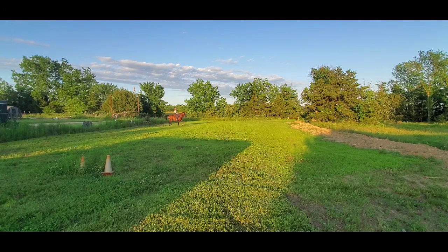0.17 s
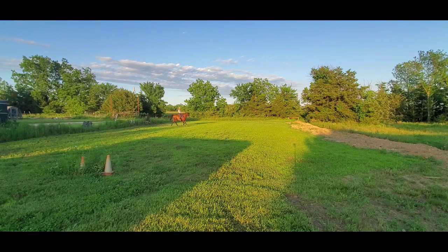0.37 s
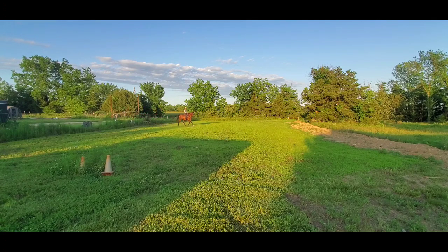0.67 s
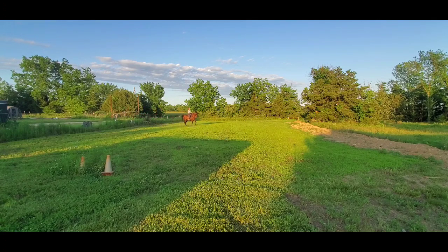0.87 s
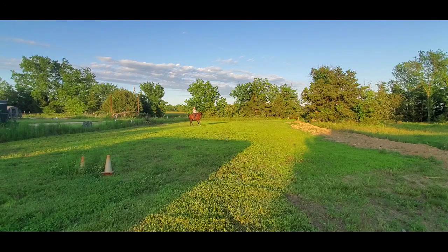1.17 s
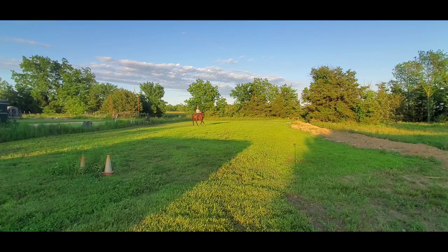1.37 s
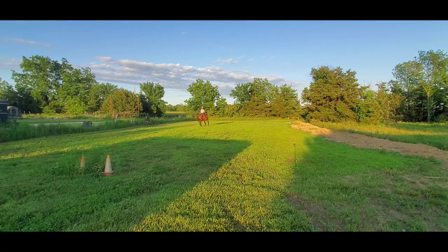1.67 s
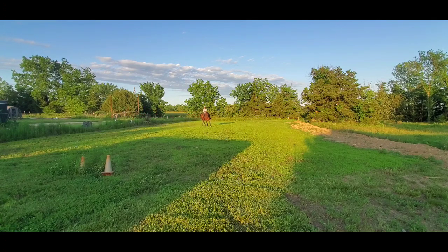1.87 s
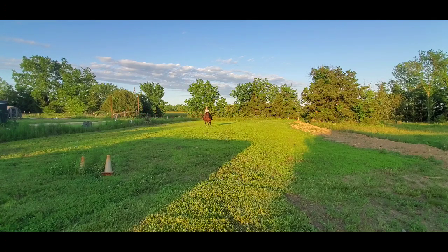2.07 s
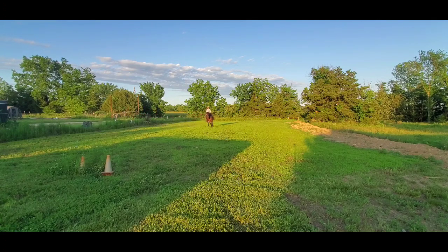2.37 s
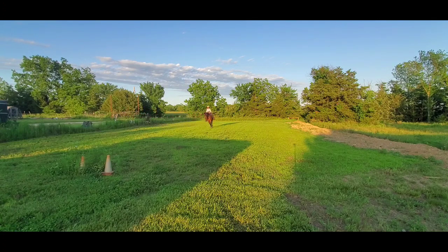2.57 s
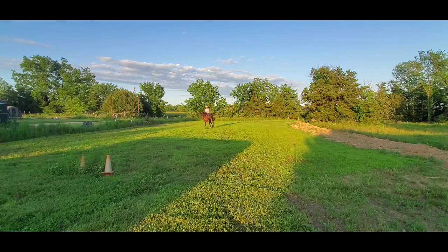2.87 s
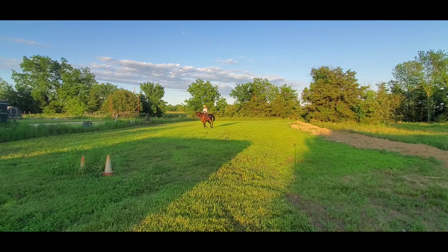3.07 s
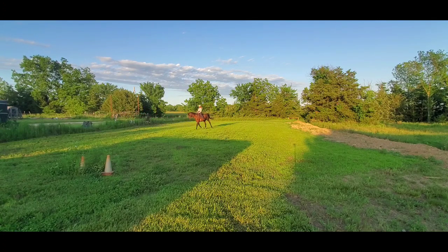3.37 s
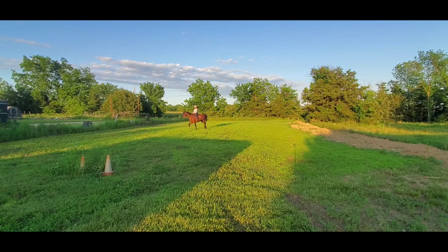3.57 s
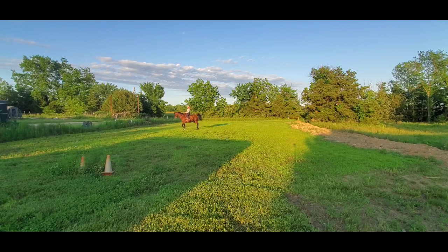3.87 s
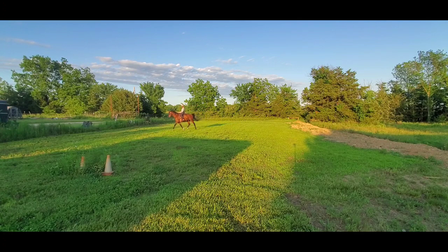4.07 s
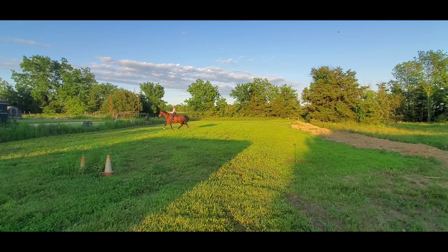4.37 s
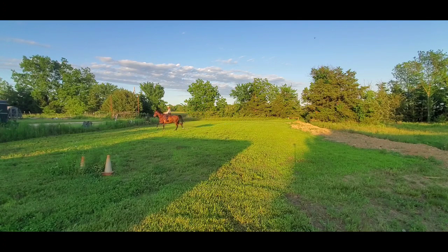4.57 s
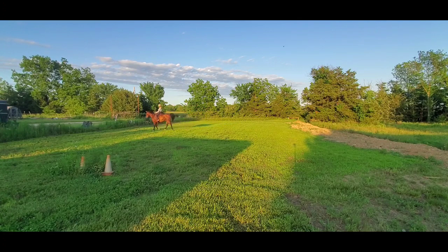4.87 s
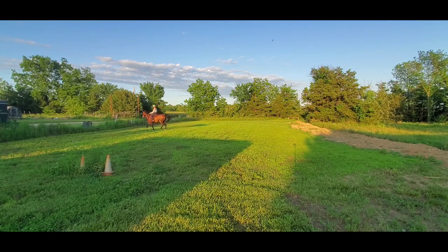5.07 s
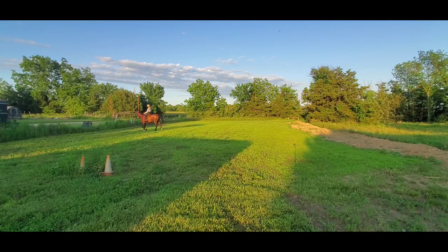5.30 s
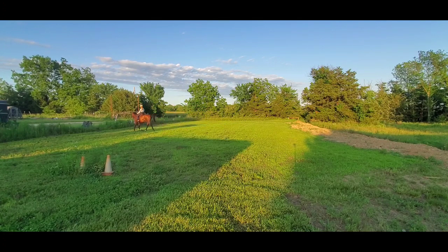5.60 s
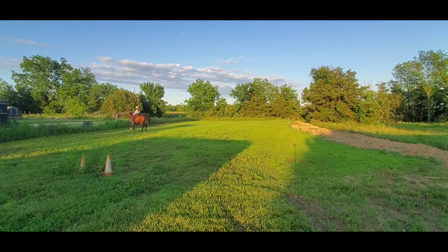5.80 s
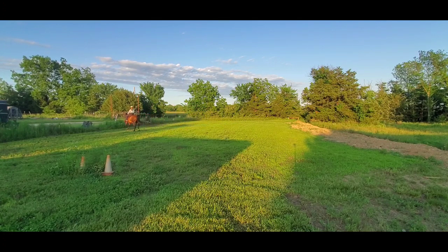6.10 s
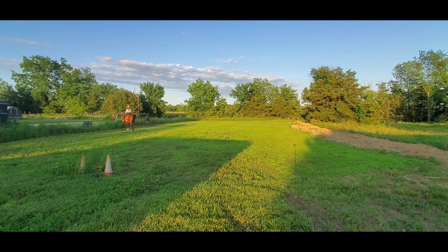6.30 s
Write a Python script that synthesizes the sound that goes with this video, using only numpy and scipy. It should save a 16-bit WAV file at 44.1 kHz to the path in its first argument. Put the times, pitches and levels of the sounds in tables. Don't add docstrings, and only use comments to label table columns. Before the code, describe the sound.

An evening meadow heard through a small stereo recorder, with nature mostly on the left and wind mostly on the right. From the start a songbird whistles rapid swooping, falling notes, with bright calls around 1.0 to 1.7 seconds and a four-syllable trill from 1.8 to 2.3; afterwards only faint far notes remain. Throughout, a bush cricket rasps in very short buzzes that swell and stop dead, over a soft high chorus of far crickets and one rough chirping cricket. Dry grass rustles in fine grains, busier from 2 seconds, with sharp stem ticks. A distant horse blows softly through its nostrils near 1.3, 3.2, 3.6, 4.65, 5.2, 5.45 and most strongly 5.8. Low gusts build from 1.7, thump heavily on the right between 2.85 and 3.75, ease towards 5.1, then return around 5.5, briefly buffeting the left too, and continue to the end at about 6.4.

```python
import sys
import numpy as np
from scipy import signal
from scipy.fft import rfft, irfft, next_fast_len
from scipy.io import wavfile
from scipy.ndimage import uniform_filter1d

SR = 44100
rng = np.random.default_rng(int(sys.argv[2]) if len(sys.argv) > 2 else 0)


def to_wav(s):
    ch = np.atleast_2d(s).T
    pcm = np.round(np.clip(ch, -1, 1) * 32767)
    wavfile.write(sys.argv[1], SR, pcm.astype(np.int16))


def gain_from_decibels(decibels):
    exponent = np.asarray(decibels, float) / 20
    return 10 ** exponent


N = 284004

# frequency in Hz, level in dB per Hz.
AIR_SPECTRUM = [(150, -18), (350, -3), (700, -4.5), (1400, -1.5), (2200, -9.5), (3200, -4.5), (7500, -10.5),
                (11000, -25.5), (15800, -9)]
# frequency in Hz, level in dB per Hz.
HISS_SPECTRUM = [(22, 20), (45, 16), (150, 9.5), (500, -6), (1300, -12), (3000, -15), (7000, -52),
                 (12000, -17.5), (15800, -30.5)]
AIR_DB, HISS_DB = -72.5, -70
# frequency in Hz, gain in dB.
COVER_LOSS = [(200, -4), (800, -15), (2500, -26), (4400, -33), (9000, -30), (15000, -31)]

# centre in Hz, width in Hz, level in dB.
CHORUS_BANDS = [
    (4202, 760, -71.5),
    (5380, 710, -65.5),
    (6360, 420, -109.5),
]
# centre in seconds, level in dB.
CRICKET_CHIRPS = [(.08, -70), (.26, -70), (.42, -68), (1.25, -68), (1.82, -66), (2.037, -67.5),
                  (2.251, -66), (2.437, -68), (2.644, -65), (2.85, -65.5), (3.051, -66.5), (3.274, -66),
                  (3.49, -65), (3.73, -65), (4.054, -66), (4.238, -66), (4.464, -66.5), (4.679, -70),
                  (4.871, -71), (5.29, -73), (5.483, -66), (5.58, -73), (5.682, -65.5), (5.79, -71),
                  (5.9, -65.5), (6.15, -72), (6.37, -73)]

# frequency in Hz, level in dB per Hz.
RUSTLE_SPECTRUM = [(1500, -7.5), (3000, -8), (6000, 1.5), (8300, -11), (10500, -1), (12500, 1),
                   (14000, 3.5), (15800, -11)]
# peak in seconds, level in dB, rise and fall in seconds per 10 dB.
GRASS_SWISHES = [(.18, -86, 1.5, 1.4), (.83, -81, .02, .3), (.98, -74.5, .035, .12), (1.4, -80.5, .07, .8),
                 (1.85, -78, .08, .04), (2.0, -70, .03, .11), (2.34, -71.5, .12, .047),
                 (2.69, -71, .115, .19), (3.06, -69, .07, .11), (3.18, -68, .05, .05),
                 (3.33, -72, .11, .28), (3.6, -68.5, .1, .08), (3.8, -69.5, .07, .16),
                 (4.04, -66, .036, .045), (4.21, -74.5, .17, .05), (4.59, -71.5, .08, .17),
                 (5.03, -74.5, .03, .076), (5.19, -72.5, .064, .13), (5.58, -71.5, .09, .062),
                 (5.72, -70, .031, .092), (5.86, -70, .025, .09), (5.99, -67, .047, .04),
                 (6.27, -71, .12, .12)]
STILL_GRASS_DB = -102
# start in seconds, peak in dB.
STEM_TICKS = [(0.814, -79), (0.9597, -68), (1.8257, -80), (1.9574, -74), (1.9926, -63), (2.3337, -64),
              (2.685, -70), (3.3214, -66), (4.361, -78), (4.6987, -75), (4.7301, -84), (5.1894, -69),
              (5.5812, -66.5), (5.7066, -71), (5.849, -64.5), (6.267, -64.5)]

# centre in seconds, length in seconds, level in dB, centre frequency in Hz.
HORSE_BLOWS = [
    (1.313, .1, -73.5, 1210),
    (3.185, 0.082, -62.5, 850),
    (3.178, .025, -70, 3200),
    (3.562, 0.098, -72, 700),
    (4.647, 0.077, -61.5, 665),
    (4.715, 0.052, -70, 900),
    (5.242, 0.05, -71.5, 890),
    (5.454, 0.067, -67.5, 630),
    (5.822, 0.083, -60, 740),
]

# last stroke in seconds, length in seconds, last stroke in dB,
# octave against the stroke in dB.
SWELLING_PHRASES = [(.1184, .108, -54, -1.5), (.172, .045, -56.5, -9), (1.313, .083, -55, -.5),
                    (1.5025, .058, -53.5, -22), (1.669, .049, -54.5, -14), (1.8534, .043, -53.5, -16),
                    (2.326, .236, -55.5, -5), (2.509, .053, -54.5, -9), (2.787, .054, -54, -2),
                    (3.2475, .044, -54.5, -7), (3.487, .057, -49.5, -3.5), (3.746, .036, -50, -6),
                    (3.92, .135, -59.5, 2.5), (4.202, .05, -56, -1), (4.4135, .054, -54, -7),
                    (4.512, .069, -56.5, 1.1), (4.6325, .043, -53, -1.1), (4.857, .037, -53.5, -8),
                    (5.096, .055, -53, -5), (5.331, .04, -56.5, -3), (5.5504, .041, -50.5, -7),
                    (5.982, .042, -57, 1.5), (6.44, .026, -57, -3)]
HELD_PHRASES = [(.4465, .05, -62, -.5), (1.084, .14, -65, -11), (2.0325, .08, -68, -1.9),
                (3.0245, .09, -57, -1.5), (3.573, .061, -55.5, -2.1), (4.009, .074, -58, -3),
                (4.977, .081, -59.5, -2.6), (5.253, .077, -71, .1), (5.7674, .07, -55.5, 1.1),
                (6.256, .096, -58.5, .1)]
SWELL_DB, HOLD_SWELL_DB = 14, 4
STROKE_HZ, HASTE_HZ_PER_S = 103, 60
CLIMB = .035

# share of the length, share of the way from first to second pitch,
# level in dB.
DROP_SHAPE = [(0, 0, -4), (.58, .2, 0), (1, 1, -16)]
SWOOP_SHAPE = [(0, 0, -20), (.45, -.06, -3), (.74, .28, -1), (1, 1, 1)]
SETTLE_SHAPE = [(0, 0, -12), (.16, .78, 0), (.45, 1, -1.5), (1, .98, -8)]
SLIDE_SHAPE = [(0, 0, -8), (.11, .5, -1.5), (.33, .73, -2.5), (.64, .89, 0), (1, 1, -7)]
ARCH_SHAPE = [(0, 0, -18), (.25, .86, 0), (.45, 1, -5), (.7, .8, -3), (.87, .45, -10), (1, -.1, -16)]
HOOK_SHAPE = [(0, 0, 0), (.17, .7, -19), (.33, 1, -30), (.56, .4, -9), (.73, .08, 0), (1, 0, -17)]
GLIDE_SHAPE = [(0, 0, -3), (.5, .5, 0), (1, 1, -6)]
# start in seconds, length in seconds, first pitch in Hz,
# second pitch in Hz, peak in dB.
DROP_NOTES = [(.163, .02, 3070, 2730, -57), (.197, .02, 3720, 3200, -49), (.31, .057, 3770, 2960, -54),
              (.392, .023, 3120, 2700, -59)]
SWOOP_NOTES = [(1.34, .063, 6550, 4990, -49), (1.565, .07, 6450, 4830, -51)]
SETTLE_NOTES = [(.372, .07, 3555, 5400, -53), (.428, .016, 3500, 3760, -52), (.603, .058, 5570, 4480, -50),
                (.84, .06, 2600, 3020, -73), (4.49, .06, 2750, 2900, -72)]
SLIDE_NOTES = [(.998, .097, 6400, 3920, -44.5)]
ARCH_NOTES = [(.095, .103, 3100, 4595, -47)]
HOOK_NOTES = [(1.095, .125, 3880, 2200, -56), (1.408, .06, 4420, 2940, -43), (1.637, .05, 4300, 2930, -48)]
GLIDE_NOTES = [(.015, .022, 3720, 3650, -57), (.43, .03, 6950, 3400, -58), (.66, .035, 4500, 5400, -63),
               (.745, .03, 3300, 3800, -59), (4.435, .055, 2350, 2800, -66), (.697, .03, 5600, 6520, -50),
               (.778, .028, 3900, 2700, -66), (.8, .08, 3850, 4150, -70), (.975, .014, 4800, 5400, -57),
               (.986, .01, 5400, 6900, -62), (.47, .07, 1950, 1780, -74), (.55, .04, 3500, 3450, -73),
               (2.6, .1, 2950, 2850, -72), (2.89, .06, 3600, 3050, -75), (2.945, .055, 3020, 2930, -66),
               (3.04, .08, 2960, 3050, -71), (3.33, .14, 4000, 3380, -65), (3.47, .1, 3300, 2950, -72),
               (3.995, .03, 2950, 3300, -68), (4.66, .2, 2830, 2760, -72), (4.72, .12, 2400, 2300, -74),
               (6.11, .09, 4300, 4400, -72), (6.2, .1, 3900, 3550, -73)]
# start in seconds, lift in dB.
TRILLS = [
    (1.788, 5.5),
    (1.936, 4.5),
    (2.083, 4.5),
    (2.227, 2.5),
]
# seconds after its start, pitch in Hz, peak in dB.
TRILL_SYLLABLE = [
    [(.003, 4300, -60), (.008, 5280, -55), (.012, 6400, -60)],
    [(.021, 6300, -66), (.026, 4850, -54), (.031, 3700, -66)],
    [(.034, 3540, -80), (.05, 3330, -66), (.075, 3210, -70), (.105, 3030, -76)],
]

# frequency in Hz, level in dB per Hz.
BUFFET_SPECTRUM = [(20, -33), (33, -10), (48, 10), (75, 3.5), (105, -5), (150, -15), (210, -23.5),
                   (300, -33), (500, -51.5), (900, -78)]
# peak in seconds, level in dB.
WIND_VEERS = [(2.48, -65), (3.23, -64), (3.39, -57), (3.57, -50), (3.72, -59), (3.79, -59), (4.05, -63),
              (4.2, -65), (4.7, -69), (4.85, -64), (4.96, -57), (5.47, -58), (5.51, -58), (5.585, -46),
              (5.63, -46), (5.67, -54), (5.86, -55), (5.92, -53), (5.95, -54), (6.32, -59), (6.42, -57)]
VEER_RISE_S, VEER_FALL_S, LEE_CALM_DB = .022, .065, -92
LEE_EDGE_HZ = 280
# time in seconds, level in dB.
GUST_FORCE = [(0, -52), (.7, -57), (1.3, -53), (1.78, -42), (2.1, -46), (2.4, -39), (2.85, -36),
              (3.0, -30.5), (3.7, -34.5), (3.8, -43), (4.5, -50), (5.15, -60), (5.35, -52), (5.46, -38),
              (5.85, -37), (5.96, -45), (6.44, -41)]
# middle in seconds, change in dB.
GUST_PUFFS = [(.4, 9), (1.09, 7), (2.48, -7), (2.97, 6), (3.25, -14), (4.27, -5), (4.46, 4), (4.56, -5),
              (4.66, 8), (5.25, 11), (5.6, -6), (5.75, -3)]
PUFF_S = .1
# start in seconds, peak in dB.
LEFT_BURSTS = [(5.576, -42), (5.613, -44), (5.65, -50), (5.668, -48), (5.855, -54)]
# start in seconds, peak in dB.
RIGHT_BURSTS = [(2.853, -29), (2.907, -25), (2.944, -31), (2.984, -21), (3.022, -33), (3.121, -30),
                (3.179, -32), (3.273, -40), (3.337, -31), (3.374, -34), (3.427, -30), (3.445, -31),
                (3.479, -31), (3.525, -22), (3.563, -31), (3.68, -31), (3.723, -24)]
SWING_HZ, SWING_RISE_S, SWING_FALL_S = 68, .005, .016
SNAP_TURNS, SNAP_S = .2, .005
# middle in seconds, peak in dB.
ROLLING_EDDIES = [(1.758, -38), (2.265, -38), (2.3, -39), (2.335, -36), (2.371, -32), (2.405, -39),
                  (2.564, -37), (2.648, -35), (2.685, -38), (2.713, -36), (2.75, -31), (2.815, -37),
                  (2.96, -27), (3.097, -28), (3.143, -27), (3.33, -29), (3.634, -32), (3.71, -29),
                  (3.909, -36), (4.037, -36), (4.218, -37), (4.44, -43), (4.661, -39), (4.7, -43),
                  (4.921, -38), (5.468, -37), (5.522, -35), (5.557, -29), (5.69, -35), (5.785, -40),
                  (5.84, -33), (5.928, -36), (6.147, -38), (6.31, -40)]
ROLL_HZ, ROLL_S = 74, .0105


def rms_one(x):
    return x / np.sqrt(np.mean(x ** 2) + 1e-20)


def colour(x, points):
    hz, db = np.transpose(points)
    size = next_fast_len(len(x) + SR // 4)
    log_hz = np.log(np.fft.rfftfreq(size, 1 / SR) + 1)
    gain_db = np.interp(log_hz, np.log(hz), db, left=db[0] - 38)
    return irfft(rfft(x, size) * gain_from_decibels(gain_db), size)[:len(x)]


def butter(x, order, hz, kind="low"):
    return signal.sosfilt(signal.butter(order, hz, kind, fs=SR, output="sos"), x)


def resonance(x, hz, width_hz):
    r = np.exp(-np.pi * width_hz / SR)
    poles = [1, -2 * r * np.cos(2 * np.pi * hz / SR), r * r]
    return signal.lfilter([(1 - r * r) / 2, 0, (r * r - 1) / 2], poles, x)


def drift(rate):
    r = np.exp(-80 * np.pi * rate / SR)
    noise = rng.standard_normal(N // 40 + 2002)
    slow = signal.lfilter([1], [1, -2 * r, r * r], noise)[2000:]
    return np.interp(np.arange(N) / 40, np.arange(len(slow)), rms_one(slow))


def add(out, s, sound):
    at = max(round(s * SR), 0)
    out[at:at + len(sound)] += sound[:N - at]


def swells(rows, calm_db):
    t = np.arange(N) / SR
    level_db = np.full(N, float(calm_db))
    for s, db, rise, fall in rows:
        level_db = np.maximum(level_db, db - 10 * np.maximum((s - t) / rise, (t - s) / fall))
    return level_db


def far_air():
    return gain_from_decibels(AIR_DB + 1.6 * drift(7)) * rms_one(colour(rng.standard_normal(N), AIR_SPECTRUM))


def port_hiss():
    return gain_from_decibels(HISS_DB + 0.36 * drift(5.9)) * rms_one(colour(rng.standard_normal(N), HISS_SPECTRUM))


def cricket_chorus():
    out = 0
    for hz, width_hz, db in CHORUS_BANDS:
        band = resonance(resonance(rng.standard_normal(N), hz, width_hz), hz, width_hz)
        out = out + gain_from_decibels(db + 0.27 * drift(4.5) + 0.96 * drift(7.8)) * rms_one(band)
    return butter(out, 8, 7100)


def lone_cricket():
    t = np.arange(N) / SR
    puffs = sum(gain_from_decibels(db + 2.5) * np.exp(-np.abs((t - s) / 0.04) ** 2.5) for s, db in CRICKET_CHIRPS)
    return puffs * rms_one(resonance(resonance(rng.standard_normal(N), 4135, 200), 4070, 260))


def grass_rustle():
    sizes = rng.standard_normal(N) * gain_from_decibels(3.4 * np.minimum(rng.exponential(1, N), 3))
    grains_per_s = 8000 * gain_from_decibels(2.0 * drift(25))
    grains = (rng.random(N) < grains_per_s / SR) * sizes
    bright = rms_one(colour(grains, RUSTLE_SPECTRUM))
    edges = np.geomspace(1800, 18000, 21)
    patches = np.zeros(N)
    for k, band in enumerate(zip(edges, edges[1:])):
        patches += (-1) ** k * gain_from_decibels(4.2 * drift(9.7)) * butter(bright, 2, band, "band")
    return gain_from_decibels(swells(GRASS_SWISHES, STILL_GRASS_DB) + 4) * patches


def stem_ticks():
    snaps, t = np.zeros(N), np.arange(900) / SR
    decay = np.exp(-t / .002) + 0.32 * np.exp(-t / 0.0087)
    for s, db in STEM_TICKS:
        add(snaps, s, gain_from_decibels(db + 8.5) * rng.standard_normal(900) * decay)
    return colour(snaps, [(2000, -40), (7000, -6), (12000, 9.0), (15800, 8.0)])


def horse():
    out = np.zeros(N)
    for centre, length, db, hz in HORSE_BLOWS:
        t = np.arange(-length, 1.5 * length, 1 / SR)
        breath = resonance(rng.standard_normal(round(.3 * SR)), hz, hz)
        breath = rms_one(butter(breath, 2, 2 * hz))[:len(t)]
        flutter = 1 + .5 * np.sin(2 * np.pi * 42 * t)
        add(out, centre - length, gain_from_decibels(db) * breath * flutter * np.exp(-(2.04 * t / length) ** 2))
    return out


def bush_cricket():
    out, octave, t = np.zeros(N), np.zeros(N), np.arange(260) / SR
    shape = np.sin(np.pi * t / t[-1]) ** 0.71
    sweep = 7440 * t - 95000 * t ** 2
    phrases = [(*row, SWELL_DB) for row in SWELLING_PHRASES]
    phrases += [(*row, HOLD_SWELL_DB) for row in HELD_PHRASES]
    for last, length, last_db, overtone_db, swell_db in phrases:
        first, stroke_hz = last - length, STROKE_HZ + HASTE_HZ_PER_S * length
        for s in np.arange(last, first - .002, -1 / stroke_hz):
            wobble, detune, late, turn = rng.standard_normal(4)
            pitch = 1 + 0.019 * detune - CLIMB * (last - s) / length
            phase = 2 * np.pi * pitch * sweep + 3 * turn
            db = np.interp(s, [first, last], [last_db - swell_db, last_db]) - 1.5 + 2.0 * wobble
            start = s - .003 + 0.00066 * late
            add(out, start, gain_from_decibels(db) * shape * np.sin(phase))
            add(octave, start, gain_from_decibels(db + overtone_db) * shape * np.sin(2 * phase))
    rasp = rms_one(signal.lfilter([1], [1, -.93], rng.standard_normal(N)))
    hoarse = octave * (.7 + .6 * rasp)
    out = out + gain_from_decibels(2.0) * resonance(resonance(hoarse, 13600, 1500), 14200, 1500)
    scatter = gain_from_decibels(-35.5 - 60 * np.arange(4000) / SR / 0.13) * rng.standard_normal(4000)
    scatter[0] = 1
    return signal.fftconvolve(out, scatter)[:N]


def song():
    kinds = [(DROP_SHAPE, DROP_NOTES), (SWOOP_SHAPE, SWOOP_NOTES), (SETTLE_SHAPE, SETTLE_NOTES),
             (SLIDE_SHAPE, SLIDE_NOTES), (ARCH_SHAPE, ARCH_NOTES), (HOOK_SHAPE, HOOK_NOTES),
             (GLIDE_SHAPE, GLIDE_NOTES)]
    notes = []
    for shape, rows in kinds:
        for s, length, first_hz, second_hz, db in rows:
            notes.append([(s + part * length, first_hz + way * (second_hz - first_hz), db + shape_db)
                          for part, way, shape_db in shape])
    return notes


def whistle(note, start=0, lift_db=0):
    s, hz, db = np.transpose(note)
    t = np.arange(s[0] - .003, s[-1] + 0.0077, 1 / SR)
    pitch = uniform_filter1d(np.interp(t, s, hz), size=110)
    edge = np.clip(np.minimum(t - t[0], t[-1] - t) / 0.0043, 0, 1)
    flutter_db = 0.5 * np.sin(2 * np.pi * (90 * t + rng.random()))
    level = edge * gain_from_decibels(np.interp(t, s, db) + lift_db + flutter_db)
    return start + t[0], level * np.sin(2 * np.pi * np.cumsum(pitch) / SR)


def bird():
    near, far = np.zeros(N), np.zeros(N)
    for note in song():
        add(near if note[0][0] < TRILLS[0][0] else far, *whistle(note))
    for start, lift_db in TRILLS:
        for k, note in enumerate(TRILL_SYLLABLE):
            add(far if k == 2 else near, *whistle(note, start, lift_db - 3.5))
    near = near * (1 + .15 * drift(70))
    far = far * (.75 + .3 * drift(90))
    t = np.arange(round(.3 * SR)) / SR
    tail = gain_from_decibels(-37 - 60 * t / 0.4) * rng.standard_normal(len(t)) * (t > .006)
    scattered = signal.fftconvolve(near + 2.2 * far, tail)[:N]
    scattered = scattered * (.5 + .8 * drift(300))
    echo = gain_from_decibels(-14) * np.roll(near + far, round(.021 * SR))
    return near + gain_from_decibels(-4) * far + scattered + echo


def buffet(level_db, eddies_per_s, even, bright):
    sizes = rng.choice([-1, 1], N) * gain_from_decibels(1.88 * np.minimum(rng.exponential(1, N), 3))
    kicks = (rng.random(N) < eddies_per_s / SR) * sizes
    lumps = rms_one(colour(rms_one(kicks) + 0.28 * rng.standard_normal(N), BUFFET_SPECTRUM))
    lumps = lumps / (uniform_filter1d(lumps ** 2, size=2600) + 0.059) ** (even / 2)
    edge = butter(lumps, 2, 110, "high")
    edge_gain = 0.71 * gain_from_decibels(bright * (level_db - level_db.max()))
    return gain_from_decibels(level_db) * rms_one(lumps + edge_gain * edge)


def thumps(bursts):
    out, t = np.zeros(N), np.arange(5000) / SR
    turns = SWING_HZ * t + SNAP_TURNS * (1 - np.exp(-t / SNAP_S))
    swing = np.sin(2 * np.pi * turns) * (1 - np.exp(-t / SWING_RISE_S)) * np.exp(-t / SWING_FALL_S)
    for s, db in bursts:
        add(out, s, gain_from_decibels(db + 11) * swing)
    return butter(out + 1e-18, 2, [25, 330], "band")


def rolls():
    out, t = np.zeros(N), np.arange(-2000, 2000) / SR
    bell = np.exp(-(t / ROLL_S) ** 2 / 2)
    for s, db in ROLLING_EDDIES:
        hz = ROLL_HZ * (1 + .08 * rng.standard_normal())
        add(out, s + t[0], gain_from_decibels(db) * np.cos(2 * np.pi * hz * t) * bell)
    return out


def sheltered_wind():
    veers = [(s, db, VEER_RISE_S, VEER_FALL_S) for s, db in WIND_VEERS]
    lee = buffet(swells(veers, LEE_CALM_DB), eddies_per_s=64.0, even=0.8, bright=0.57)
    edge = gain_from_decibels(9.5) * resonance(lee, LEE_EDGE_HZ, 90)
    return butter(lee, 1, 40, "high") + edge + thumps(LEFT_BURSTS)


def exposed_wind():
    t = np.arange(N) / SR
    gust_db = np.interp(t, *np.transpose(GUST_FORCE))
    puffs_db = sum(db * np.maximum(1 - np.abs(t - s) / PUFF_S, 0) for s, db in GUST_PUFFS)
    gust = buffet(gust_db + puffs_db - 4.5, eddies_per_s=120., even=1.0, bright=0.74)
    return gust + thumps(RIGHT_BURSTS) + rolls()


def scene():
    field = cricket_chorus() + lone_cricket() + grass_rustle() + stem_ticks() + horse() + bush_cricket() + bird()
    covered = colour(np.concatenate([field[20:], np.zeros(20)]), COVER_LOSS)
    left = far_air() + field + sheltered_wind()
    right = port_hiss() + covered + exposed_wind()
    return np.array([left, right])


def starve(x, under_db, whim_db, size, low_hz, high_hz, most_db):
    frames = signal.stft(x, nperseg=2048)[2]
    bands = frames[:1024].reshape(1024 // size, size, -1)
    power = uniform_filter1d(np.mean(np.abs(bands) ** 2, axis=1), size=3) + 1e-20
    around = uniform_filter1d(power, size=9, axis=0)
    depth_db = 10 * np.log10(around / power).clip(max=most_db)
    whim = uniform_filter1d(rng.standard_normal(power.shape), size=3)
    whim = rms_one(uniform_filter1d(whim, size=2, axis=0))
    hz = np.arange(len(bands))[:, None] * size * SR / 2048
    silent = (depth_db + whim_db * whim > under_db) & (hz > low_hz) & (hz < high_hz)
    frames[:1024] = (bands * np.where(silent, .06, 1)[:, None]).reshape(1024, -1)
    return signal.istft(frames, nperseg=2048)[1][:N]


def band_limit(x):
    return signal.sosfilt(signal.butter(12, 15710, fs=SR, output="sos"), x)


def record(dry):
    left, right = dry
    left = starve(left, under_db=9, whim_db=4, size=16, low_hz=6800, high_hz=17000, most_db=5.5)
    left = starve(left, under_db=8, whim_db=3, size=4, low_hz=1900, high_hz=3550, most_db=3)
    top_cut = signal.ellip(10, .3, 70, 15750, fs=SR, output="sos")
    return band_limit(signal.sosfilt(top_cut, np.array([left, right])))


dry = scene()
out = record(dry)
to_wav(out)
```